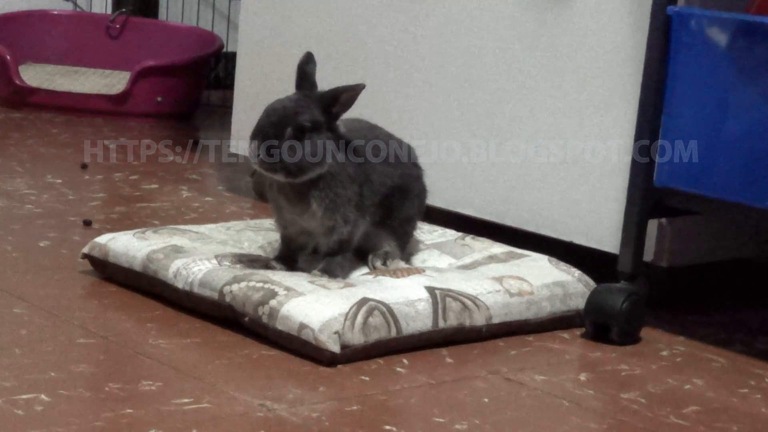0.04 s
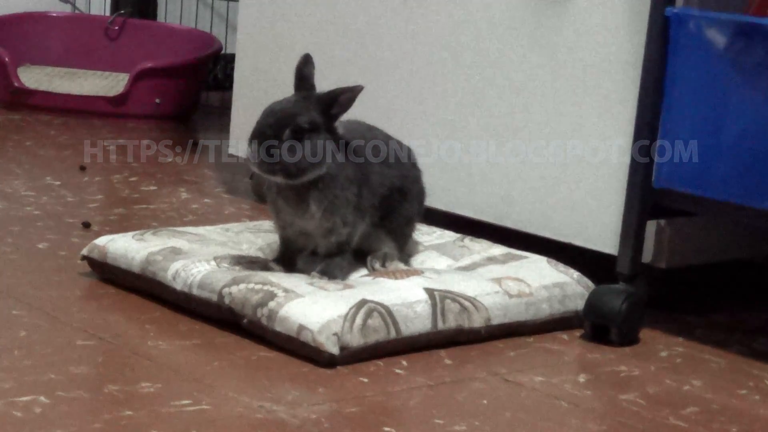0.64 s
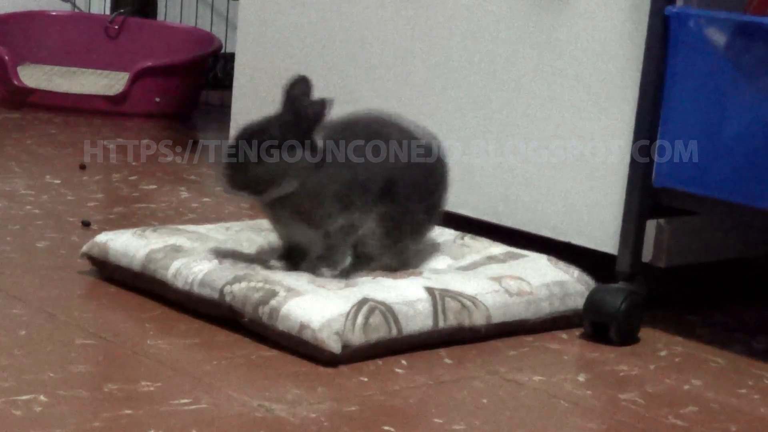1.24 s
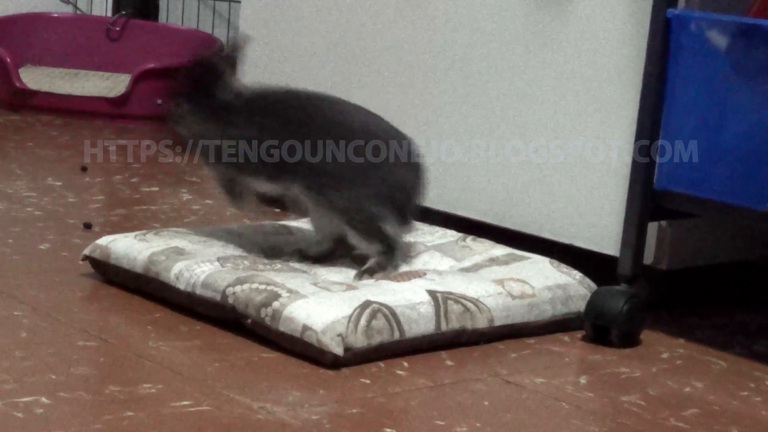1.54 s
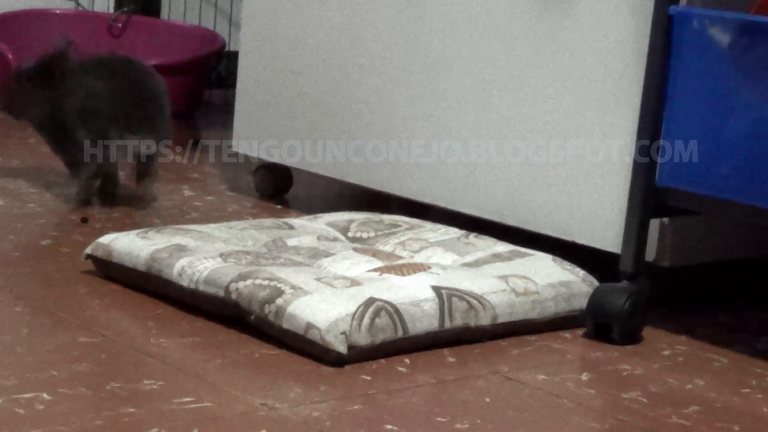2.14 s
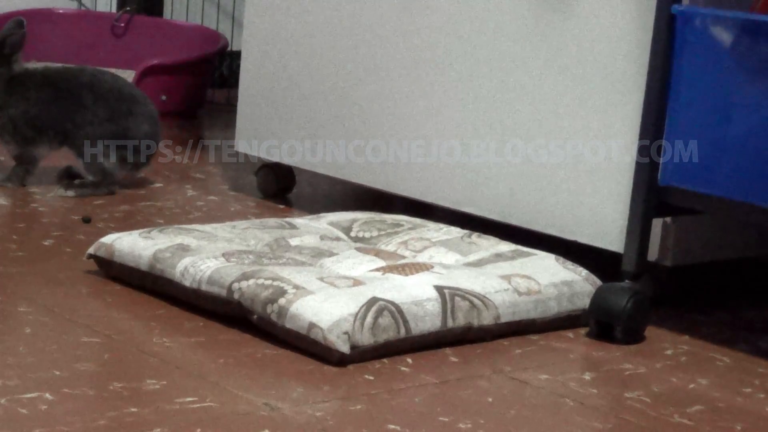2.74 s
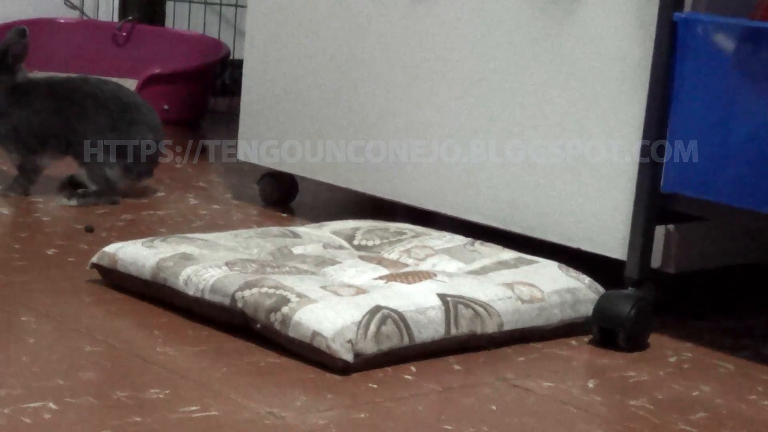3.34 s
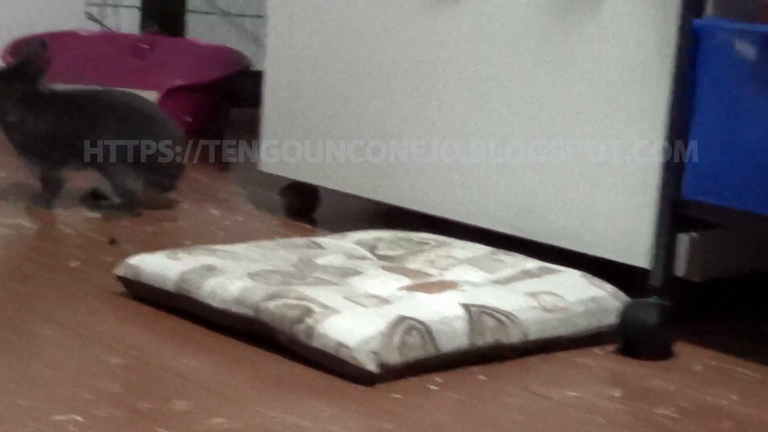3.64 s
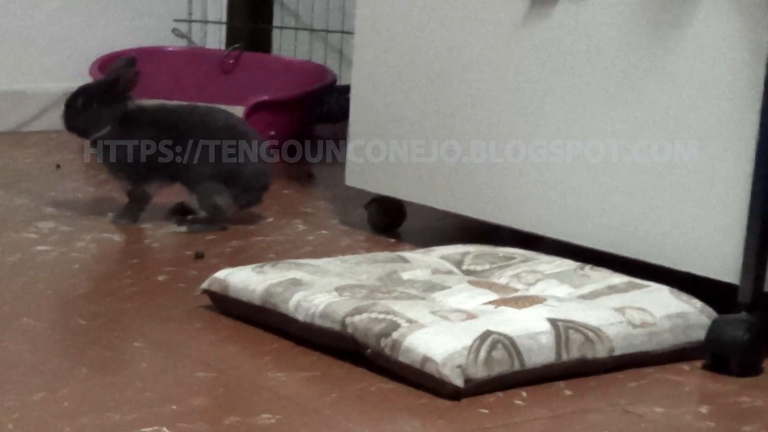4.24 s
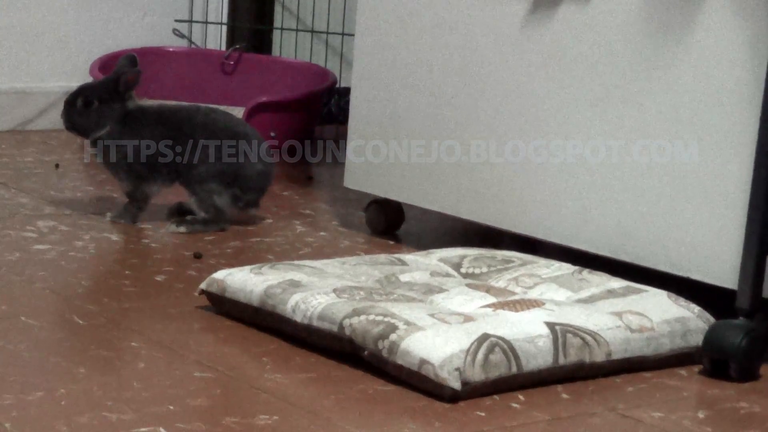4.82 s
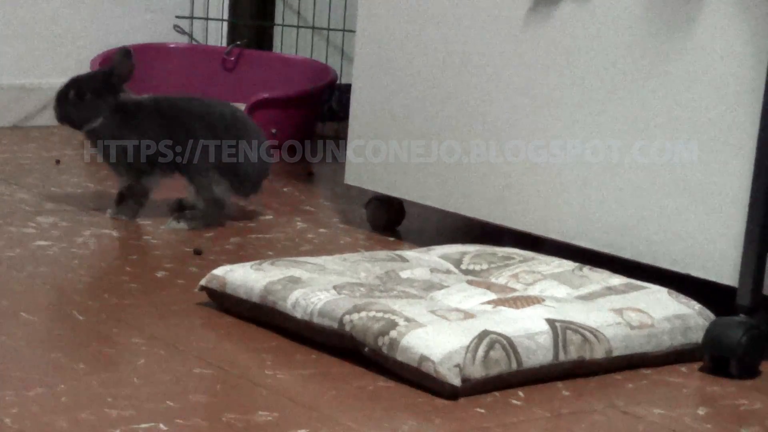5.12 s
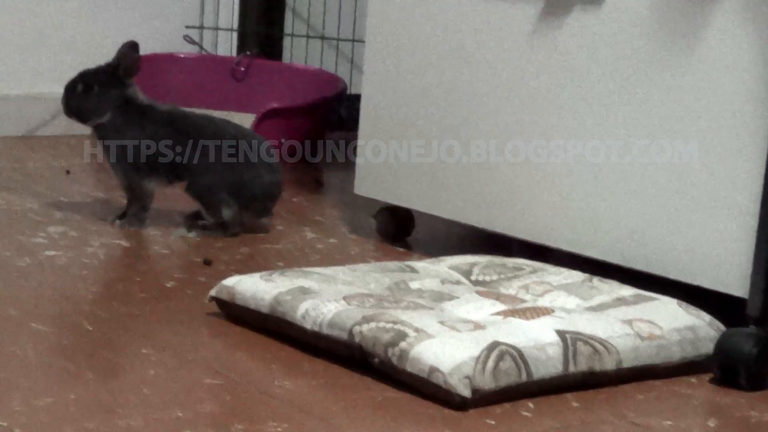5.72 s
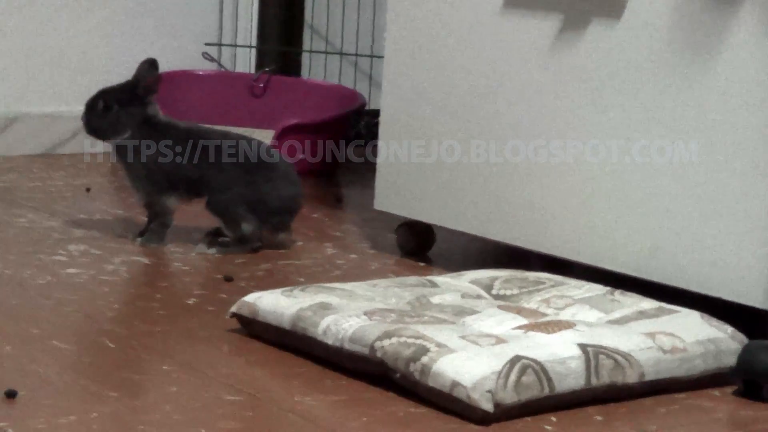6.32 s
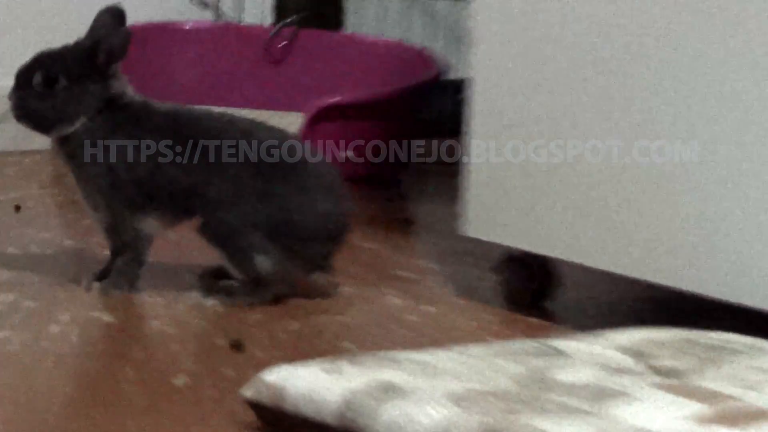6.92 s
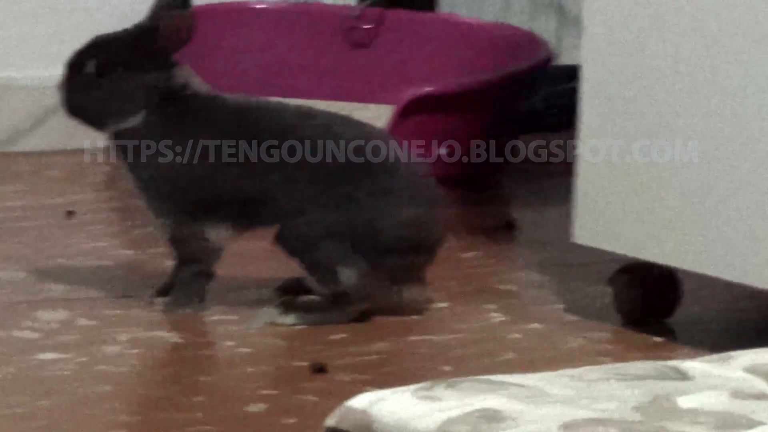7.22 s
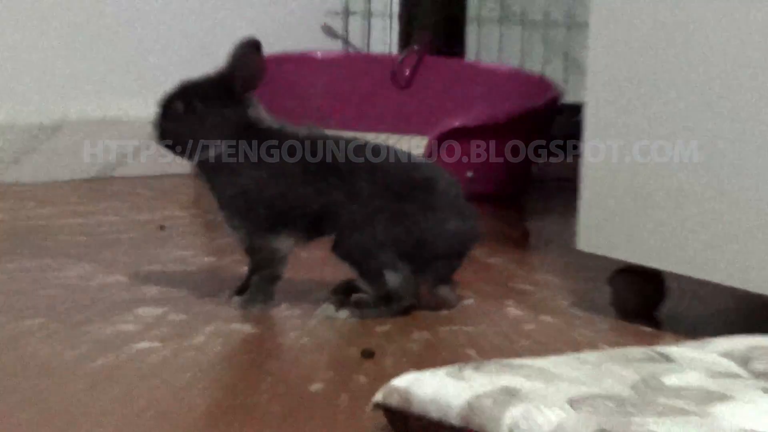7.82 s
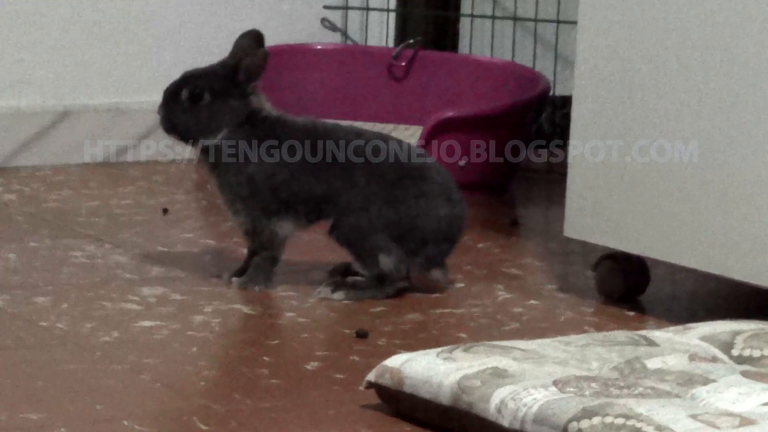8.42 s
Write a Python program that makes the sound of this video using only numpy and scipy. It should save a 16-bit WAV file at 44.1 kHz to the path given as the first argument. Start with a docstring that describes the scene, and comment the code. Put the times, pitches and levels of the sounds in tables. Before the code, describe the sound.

Two isolated rabbit foot stamps, one muffled and one sharp, ring briefly in a small room, with faint hum and close plastic creaks and ticks.

```python
"""A rabbit stamps its hind feet twice: a dull thump on a cushion, then a sharp slap on bare floor.
Heard in a small, hard-walled room, from the stereo microphone of a hand-held camera; each stamp
sets the low room modes booming. Right at the microphone the case creaks, ticks and rubs in the grip.
Behind it all lies quiet room tone: air, appliance hum and the line whistle of a picture tube."""
import sys
import numpy as np
from scipy import signal
from scipy.fft import rfft, irfft, next_fast_len
from scipy.io import wavfile
from scipy.ndimage import map_coordinates

SR = 44100
rng = np.random.default_rng(int(sys.argv[2]) if len(sys.argv) > 2 else 0)


def store_pcm(level_fs):
    """Save levels as 16-bit WAV."""
    pcm = np.round(np.clip(level_fs, -1, 1) * 32767).astype(np.int16)
    wavfile.write(sys.argv[1], SR, np.atleast_2d(pcm).T)


N = 381906
HIT = np.arange(SR) / SR  # the second after a blow


# a foot's blow on the cushion: f/Hz, level/dB
CUSHION_BLOW = [(30, -15), (80, 1), (180, 7), (290, 10.5), (380, 3.5), (520, 5), (750, 1.5), (950, 2.5),
                (1300, -6.5), (1650, -1), (2050, -6.5), (2450, -6.5), (3500, -17.5), (7000, -28),
                (11500, -30), (15000, -41)]
# fur and claws brushing the cover: t/s, level/dB, t60/s, centre f/Hz
FUR_BRUSHES = [(1.262, -41.5, 0.056, 3000), (1.276, -47.5, 0.067, 5800)]
def cushion_stamp(s):
    """The cushion muffles the feet into a thud while fur brushes its cover."""
    path = room_path(walls_db=0.5, tail_db=1.6) + second_foot(lag_s=0.0131, db=1.5, smear_s=0.4)
    thump = stamp(s, CUSHION_BLOW, path, room_boom("cushion"))
    thud = recoil(s, hz=164, db=-19, t60=0.11, rise_s=0.0013)
    cloth = friction(FUR_BRUSHES, rise_s=0.0015, octaves=0.96)
    return pan(0.68) * (thump + thud + cloth)


# a foot's blow on bare floor: f/Hz, level/dB
FLOOR_BLOW = [(30, -3), (80, 8), (190, 17), (310, 3.5), (560, 13), (900, 9), (1400, 14.5), (2500, 6.5),
              (4000, 3.5), (6500, 4.5), (9000, -5.5), (12500, -13), (15500, -33)]
def floor_stamp(s):
    """The bare floor lets the stamp crack."""
    path = room_path(walls_db=-5, tail_db=3) + second_foot(lag_s=0.0012, db=-0.5, smear_s=0.00013)
    slap = stamp(s, FLOOR_BLOW, path, room_boom("floor"))
    clack = recoil(s, hz=1300, db=-8, t60=0.0073, rise_s=0.00091)
    return pan(1.4) * (slap + clack)


def stamp(s, blow, path, boom):
    """A blow travels its path to the microphone, with the room booming under it."""
    out = np.zeros((2, N))
    add(out, s, signal.fftconvolve(path, pulse(blow)[None], axes=1))
    add(out, s, boom)
    return out


def second_foot(lag_s, db, smear_s):
    """The other foot lands just after, flatter and duller: its push is spread out in time."""
    out = np.zeros(SR)
    push = np.exp(-HIT / smear_s)
    add(out, lag_s, -amp(db) * push / push.sum())
    return out


def recoil(s, hz, db, t60, rise_s):
    """The struck surface springs back in heavily damped cycles; the sound follows its velocity."""
    out = np.zeros(N)
    sag = dying(t60) * np.sin(2 * np.pi * hz * HIT) * rising(rise_s)
    add(out, s, amp(db) * np.gradient(sag, HIT) / (2 * np.pi * hz))
    return out


# the small room's low modes: f/Hz, t60/s, level/dB from the cushion, level/dB from the floor
ROOM_MODES = [(62.2, 0.76, -41, -38.5), (100.7, 0.75, -47, -44), (128, 0.55, -36.5, -50),
              (140.6, 0.65, -47, -27.5), (157.7, 0.75, -38, -28.5), (196.3, .66, -37.5, -29.5),
              (219, 0.56, -41, -42), (406, 0.31, -39, -49), (511, 0.33, -47, -34), (567, 0.39, -50, -40),
              (584, 0.31, -47, -32), (679, .3, -42, -39)]
def room_boom(place):
    """Standing waves swell and ring, their balance set by where the feet land."""
    boom = np.zeros(SR)
    for hz, t60, cushion_db, floor_db in ROOM_MODES:
        db = cushion_db if place == "cushion" else floor_db
        boom += amp(db) * dying(t60) * np.sin(2 * np.pi * hz * HIT)
    return boom * rising(0.006)


# early echoes off nearby furniture and walls: delay t/s, level/dB
WALL_ECHOES = [(.0031, -2.5), (.0089, -16), (.0112, -2.5), (0.013, -6), (.0253, -6), (0.033, -6)]
def room_path(walls_db, tail_db):
    """From foot to microphone: direct sound, echoes smeared by clutter, then reverberation."""
    path = amp(tail_db) * room_tail(build_s=0.003)
    path[:, 0] += 1  # direct sound
    for delay, db in WALL_ECHOES:
        echo = stereo_noise(TAIL_LIKENESS, size=256) * dying(0.009, HIT[:256])
        add(path, delay, amp(db + walls_db) * echo / np.linalg.norm(echo[0]))
    return path


# decay between the hard walls: f/Hz, t60/s
TAIL_T60 = [(80, .7), (210, 0.5), (560, 0.51), (1470, 0.46), (3880, 0.41), (10000, 0.32)]
# tone of the reverberation: f/Hz, level/dB
TAIL_SPECTRUM = [(40, -3), (150, 3), (300, 6), (600, 4.5), (1400, 1.5), (3000, -0.5), (5500, -1.5),
                 (9000, -7), (15000, 10)]
# reflected sound at the microphone: f/Hz, left-right likeness
TAIL_LIKENESS = [(60, .99), (180, 0.86), (500, 0.7), (1650, .66), (5000, 0.76), (8000, .93), (10000, 1)]
def room_tail(build_s):
    """Diffuse reverberation builds up briefly; the treble dies first."""
    hz, t, bands = signal.stft(stereo_noise(TAIL_LIKENESS, SR), SR, nperseg=256)
    decay = dying(along(TAIL_T60, hz)[:, None], t)
    decay /= np.sqrt(SR * np.mean(decay ** 2, axis=1, keepdims=True))  # equal energy per band
    tail = signal.istft(bands * decay, SR, nperseg=256)[1][:, :SR]
    build = 1 - np.exp(-(HIT / build_s) ** 2)
    return filtered(tail, lambda f: amp(along(TAIL_SPECTRUM, f))) * build


# creaks at the microphone: t/s, level/dB, left-right/dB, share of the case's t60, treble edge f/Hz
CASE_CREAKS = [(3.5483, -39.5, 0, 0.2, 7000), (6.9615, -29, 0, 0.46, 4000), (6.9649, -20.5, 0.5, 1, 12000),
               (7.0506, -29.5, 3, .4, 4100), (7.0882, -26.5, 1, 0.2, 4580), (7.246, -39, -1, 0.34, 4200)]
# modes of the camera's case: f/Hz, level/dB, t60/s
CASE_MODES = [(866, -10.5, 0.038), (1115, -16.5, 0.053), (1380, -8.5, .025), (1650, -8, 0.038),
              (2055, -5.5, 0.046), (2620, -13, 0.03), (2920, -18, .015), (5100, -8, 0.014),
              (10500, -21, .018)]
# a slip of plastic: f/Hz, level/dB
SLIP_SPECTRUM = [(450, -25), (900, -13), (1600, 4.5), (3200, -4), (4200, -13.5), (5500, -8.5), (8000, -21),
                 (15000, -30)]
def case_creaks():
    """The plastic case slips and rings right beside the microphone, so the room adds nothing."""
    out, t = np.zeros((2, N)), HIT[:SR // 10]
    for s, db, side_db, ring, edge_hz in CASE_CREAKS:
        body = np.zeros((2, len(t)))
        for hz, mode_db, t60 in CASE_MODES:
            envelope = amp(mode_db + rng.normal(0, 0.89)) * dying(t60 * ring, t)
            body += envelope * np.sin(2 * np.pi * (hz * t + rng.random()) + rng.normal(0, 0.4, (2, 1)))
        slip = filtered(stereo_noise([(1000, 0.61)], len(t)), lambda f: amp(along(SLIP_SPECTRUM, f)))
        snap = (body + amp(-2) * unit(slip) * dying(0.017, t)) * rising(0.00067, t)
        dulled = filtered(snap, lambda f: 1 / np.sqrt(1 + (f / edge_hz) ** 6))
        add(out, s, amp(db) * pan(side_db) * dulled)
    return out


# light clicks: t/s, level/dB, treble tilt/(dB per octave)
LIGHT_TICKS = [(1.914, -53, 2), (3.3625, -48, -7), (3.6922, -38.5, -0.5), (3.7924, -45.5, -2),
               (4.3425, -48.5, -9), (6.268, -46, -17), (6.423, -48, -4.5), (7.3072, -48, -7),
               (7.627, -47.5, -10), (8.4838, -48, -11)]
# a click before its tilt: f/Hz, level/dB
TICK_SPECTRUM = [(500, -40), (1200, -13), (2000, -1), (3200, 3.5), (4500, -0.5), (6300, -5), (9500, 0.5),
                 (15000, -5)]
def ticks():
    """Claws and the grip make tiny dry clicks, each with its own brightness."""
    out, t = np.zeros((2, N)), HIT[:SR // 10]
    for s, db, tilt_db in LIGHT_TICKS:
        colour = lambda f: amp(along(TICK_SPECTRUM, f) + tilt_db * np.log2(np.maximum(f, 1500) / 3000))
        noise = filtered(stereo_noise([(1000, 0.66)], len(t)), colour)
        add(out, s, amp(db) * unit(noise) * dying(0.02, t))
    return out


# fingers on the case, close to the microphone: t/s, level/dB, t60/s, centre f/Hz
FINGER_RUBS = [(5.738, -50, 0.28, 2460), (6.262, -57, .55, 2400), (6.534, -41, 0.12, 230)]
def finger_rubs():
    """Fingers slide briefly over the plastic."""
    return friction(FINGER_RUBS, rise_s=0.006, octaves=0.94)


def friction(strokes, rise_s, octaves):
    """Short grainy hisses of one surface sliding on another."""
    out = np.zeros((2, N))
    for s, db, t60, centre_hz in strokes:
        hiss = band(stereo_noise([(1000, 0.89)], SR), centre_hz, octaves)
        grain = amp(3.7 * wobble(250, size=SR))
        add(out, s, amp(db) * unit(hiss * grain) * dying(t60) * rising(rise_s))
    return out


def grip_rumble(start_s, attack_s=0.15, db=-62.5, ease_db_per_s=1, sway_db=2):
    """The moving hand rumbles through the case into both channels alike, easing as it settles."""
    t = np.maximum(np.arange(N) / SR - start_s, 0)
    level_db = db - ease_db_per_s * t + sway_db * wobble(5)
    rumble = band(rng.standard_normal(N), centre_hz=87, octaves=0.19)
    return amp(level_db) * np.minimum(t / attack_s, 1) * unit(rumble)


# the room's air: f/Hz, relative level/dB
AIR_SPECTRUM = [(20, -16), (42, -9), (65, -3.5), (90, -7.5), (140, -1), (200, 2), (280, -7), (350, -1.5),
                (470, -3.5), (620, -2), (1000, -11.5), (1400, -12.5), (3700, -21.5), (15500, -28.5)]
# that air at the microphone: f/Hz, left-right likeness
AIR_LIKENESS = [(60, 1.0), (120, 1.0), (240, 0.98), (480, 0.93), (950, 0.7), (1890, 0.34), (3770, 0.47),
                (7520, 0.93), (15000, 1.0)]
def room_air():
    """Steady air noise with a faint narrow hiss in the treble."""
    colour = lambda f: amp(along(AIR_SPECTRUM, f) + 2.2 * np.exp(-((f - 2575) / 70) ** 2))
    return amp(-52.5) * unit(filtered(stereo_noise(AIR_LIKENESS, N), colour))


# appliances in the background: f/Hz, rms level/dB, waver/dB
HUM_LINES = [(49.4, -61.5, 1.5), (119.5, -62, 1.5), (132.2, -63.5, 3), (189, -76.5, 2), (224.4, -71.5, 3.5),
             (15625, -71.5, 1)]
def appliance_hum():
    """Motors and mains hum and a picture tube whistles, each tone wavering slightly."""
    out, t = np.zeros(N), np.arange(N) / SR
    for hz, db, waver_db in HUM_LINES:
        peak = np.sqrt(2) * amp(db + waver_db * wobble(3.08))
        out += peak * np.sin(2 * np.pi * (hz * t + rng.random()) + 0.11 * wobble(2.06))
    return out


def amp(db):
    """Decibels to gain."""
    return 10 ** (np.asarray(db) / 20)


def unit(x):
    """Scale to rms 1."""
    return x / np.sqrt(np.mean(x ** 2) + 1e-20)


def along(points, hz):
    """Read (f/Hz, value) points on a log axis."""
    f, v = np.transpose(points)
    return np.interp(np.log(hz + 1), np.log(f + 1), v)


def filtered(x, response):
    """Shape x by a gain that depends on frequency."""
    n = x.shape[-1]
    m = next_fast_len(n + 8192)
    return irfft(rfft(x, m) * response(np.fft.rfftfreq(m, 1 / SR)), m)[..., :n]


def band(x, centre_hz, octaves):
    """A bell-shaped band of x."""
    return filtered(x, lambda f: np.exp(-(np.log2((f + 1) / centre_hz) / octaves) ** 2))


def pulse(spectrum, size=4096):
    """The shortest causal pulse with this spectrum."""
    gain = amp(along(spectrum, np.fft.rfftfreq(size, 1 / SR)))
    cepstrum = irfft(np.log(gain))
    cepstrum[1:size // 2] *= 2
    cepstrum[size // 2 + 1:] = 0
    return irfft(np.exp(rfft(cepstrum)))


def stereo_noise(likeness, size):
    """White noise with the given left-right likeness."""
    turn = lambda hz: np.arccos(np.clip(along(likeness, hz), -1, 1)) / 2
    shares = lambda hz: np.array([np.cos(turn(hz)), np.sin(turn(hz))])
    mid, side = filtered(rng.standard_normal((2, size)), shares)
    return np.array([mid + side, mid - side])


def wobble(rate, size=N):
    """A smooth random curve, rate knots a second."""
    knots = rng.standard_normal(int(size * rate / SR) + 4)
    fine = np.arange(0, len(knots) - 1, 1 / 10)
    return np.interp(np.arange(size) * rate / SR, fine, map_coordinates(knots, [fine]))


def rising(rise_s, t=HIT):
    """An exponential rise to 1."""
    return 1 - np.exp(-t / rise_s)


def dying(t60, t=HIT):
    """A decay of 60 dB in t60 seconds."""
    return amp(-60 * t / t60)


def pan(db):
    """Left and right gains, the left louder by db."""
    return amp([[db / 2], [-db / 2]])


def add(track, s, sound):
    """Mix a sound in at time s."""
    part = track[..., round(s * SR):][..., :sound.shape[-1]]
    part += sound[..., :part.shape[-1]]


def scene():
    """The rabbit in the room, handling noise at the microphone, room tone behind."""
    handling = case_creaks() + ticks() + finger_rubs() + grip_rumble(start_s=5.5)
    rabbit = cushion_stamp(s=1.2632) + floor_stamp(s=5.1998)
    room_tone = pan(0.35) * (room_air() + appliance_hum())
    return rabbit + handling + room_tone


def record(dry):
    """The camera keeps nothing above its band limit."""
    return filtered(dry, lambda hz: hz < 15830)


dry = scene()
out = record(dry)
store_pcm(out)
```